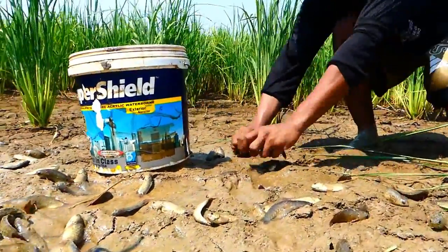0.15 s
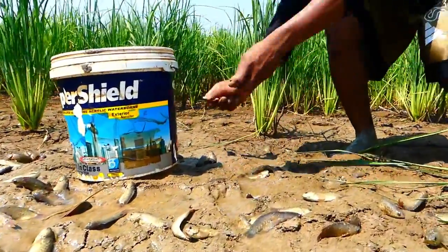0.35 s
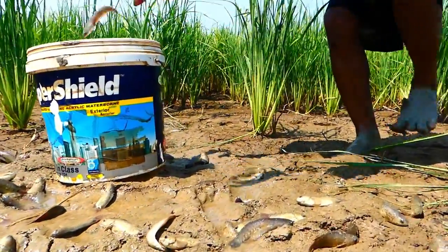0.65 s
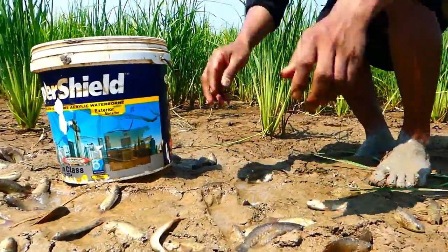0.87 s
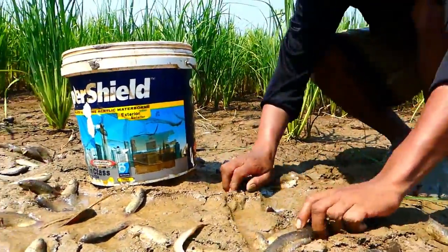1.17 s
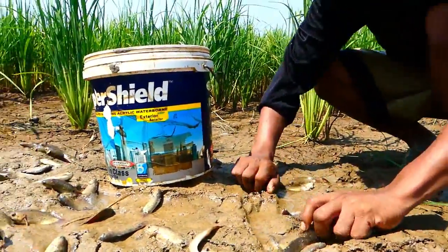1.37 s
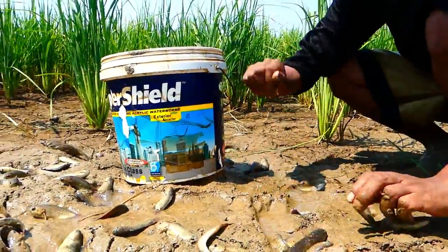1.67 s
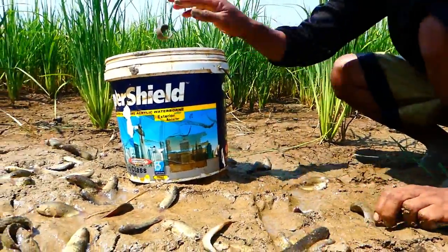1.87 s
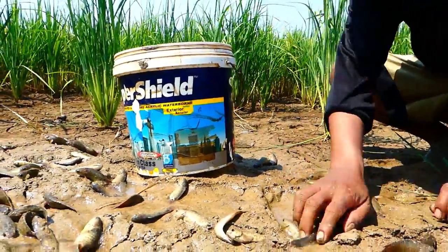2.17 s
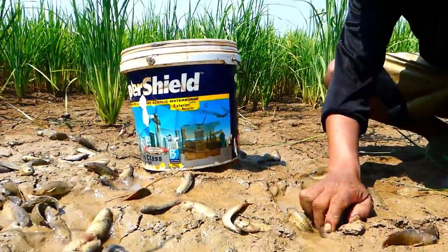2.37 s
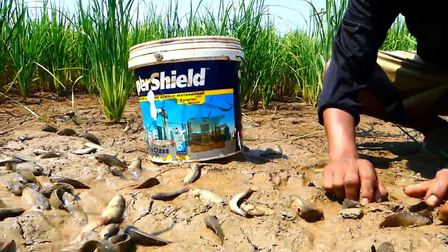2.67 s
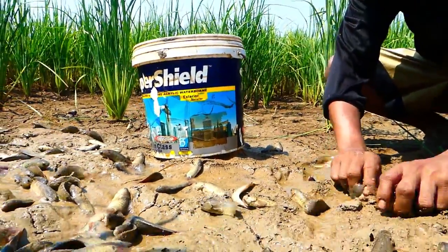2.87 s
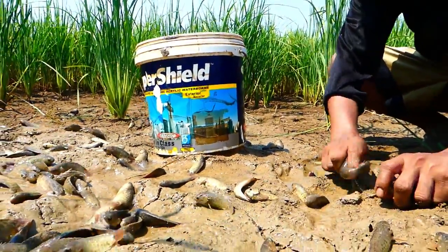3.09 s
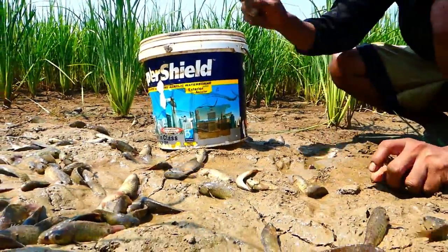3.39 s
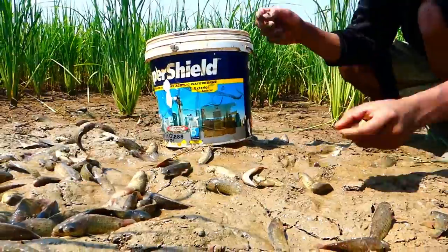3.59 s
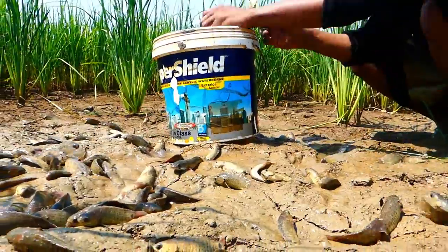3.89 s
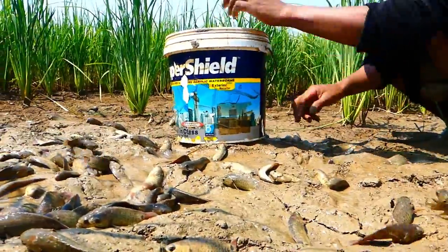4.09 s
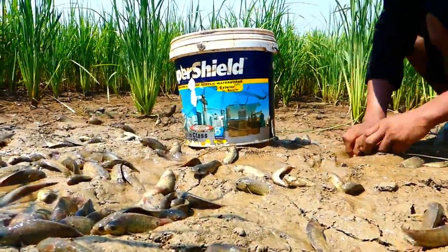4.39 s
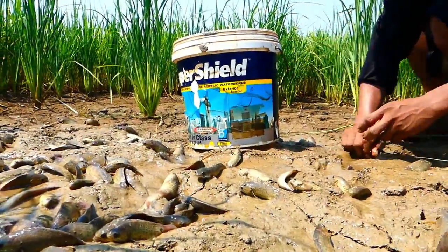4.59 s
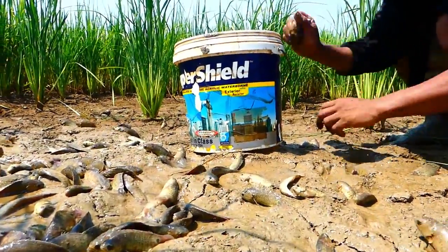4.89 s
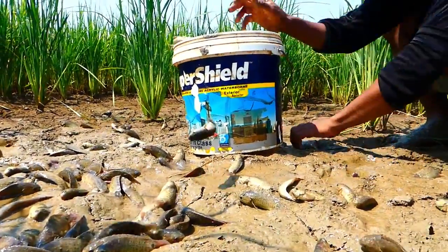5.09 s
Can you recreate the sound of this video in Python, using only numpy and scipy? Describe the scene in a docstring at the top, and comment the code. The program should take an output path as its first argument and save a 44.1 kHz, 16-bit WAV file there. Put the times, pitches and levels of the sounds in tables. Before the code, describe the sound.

Dull, wet thuds come in uneven clusters as fish flop and hands grab at them in a muddy field. Sharp little pops, squelches and a brief slippery squeak fill the middle, then a louder run of slaps follows. A few hollow plastic bucket knocks sound early on and at the close. Fine crackling from wriggling fish continues underneath, heard nearby in dry, open air.

```python
"""Fish flopping in a muddy field

Live fish flop on the soft mud of a drained field while someone drops them in a plastic bucket.
Bodies, hands and feet land with dull thuds and wet spatter; mud squelches, pops and squeaks as it
lets go. Under it all a heap of fish wriggles with a sticky crackle, in open air with almost no echo."""
import sys
import numpy as np
from scipy import signal
from scipy.fft import rfft, irfft
from scipy.io import wavfile
from scipy.ndimage import uniform_filter1d

SR = 44100
rng = np.random.default_rng(int(sys.argv[2]) if len(sys.argv) > 2 else 0)


def store_pcm(level_fs):
    """Save levels as 16-bit WAV."""
    pcm = np.round(np.clip(level_fs, -1, 1) * 32767).astype(np.int16)
    wavfile.write(sys.argv[1], SR, np.atleast_2d(pcm).T)


N = 231294


def gain_of(db):
    """Turns decibels into a number to multiply a sound by."""
    return 10 ** (np.asarray(db) / 20)


def evened(x):
    """Scales x to an average strength (rms) of 1."""
    return x / np.sqrt(np.mean(x ** 2) + 1e-20)


def wobble(size, smooth_samples):
    """A random curve that drifts up and down."""
    return evened(uniform_filter1d(rng.standard_normal(size), smooth_samples))


def read(points, hz):
    """Looks up hz in a table, blending between rows on a log-frequency scale."""
    f, value = np.transpose(points)
    return np.interp(np.log(hz + 1), np.log(f + 1), value)


def add(mix, s, sound):
    """Mixes a sound in, starting at s seconds."""
    part = mix[:, max(round(s * SR), 0):][:, :sound.shape[-1]]
    part += sound[..., :part.shape[1]]


def panned(x, pan_db):
    """Places a sound to the left (above 0 dB) or right (below)."""
    return x * gain_of([[pan_db / 2], [-pan_db / 2]])


def coloured(x, spectrum):
    """Gives x a colour (a balance of low and high), at strength 1."""
    size = x.shape[-1]
    gains = gain_of(read(spectrum, np.fft.rfftfreq(size, 1 / SR)))
    return evened(irfft(rfft(x) * gains, size))


# how alike the two ears hear a noise: f/Hz, likeness (1 = the same)
EAR_LIKENESS = [(40, 0.14), (120, 0.09), (300, 0.25), (1000, 0.33), (2500, 0.5), (6000, 0.8), (14000, 0.42)]
def noise(spectrum, size, grit=0.):
    """Stereo noise, partly alike in both ears; grit makes it grainy."""
    white = rng.standard_normal((2, size))
    grains = np.exp(grit * np.clip(rng.standard_normal(size), -2, 2))
    left, other = rfft(white * grains)
    same = np.clip(read(EAR_LIKENESS, np.fft.rfftfreq(size, 1 / SR)), -1, 1)
    right = same * left + np.sqrt(1 - same ** 2) * other
    return coloured(irfft([left, right], size), spectrum)


def droplets(spectrum, size, grit=0.77, tint_db=2.6):
    """Grainy noise with its own colour: every splash finds other hollows in the mud."""
    hz = np.geomspace(40, 16000, 28)
    levels = read(spectrum, hz) + tint_db * rng.standard_normal(len(hz))
    return noise(np.transpose([hz, levels]), size, grit)


def swell(t, peak_s):
    """Rises to 1 at peak_s, then dies away."""
    return t / peak_s * np.exp(1 - t / peak_s)


def ring(t, hz, peak_s, bend=0):
    """A pocket of air rings briefly; with bend=0.2 it starts 20% high and settles to hz."""
    turns = hz * (t + bend * peak_s * (1 - np.exp(-t / peak_s)))
    return swell(t, peak_s) * np.sin(2 * np.pi * turns)


# colour of the open air: f/Hz, level/dB
AIR_COLOUR = [(20, 10), (100, 2.5), (350, 5), (900, 5.5), (1900, -3.5), (2500, -0.5), (4200, -6),
              (7500, -23), (10000, -18), (16000, -25)]
def field_air(level_db=-51):
    """The steady hiss of the open field."""
    return gain_of(level_db) * noise(AIR_COLOUR, N)


# faint trills: t/s, length/s, level/dB
INSECT_CALLS = [(0, 0.1, -58), (0.598, 0.14, -58.5), (1.382, 0.25, -56)]
# their colour: f/Hz, level/dB
INSECT_COLOUR = [(2000, -59), (2800, -2), (2950, 1), (3100, -11), (4200, -50)]
def insect():
    """A thin, high buzz comes and goes, perhaps a far insect."""
    out = np.zeros((2, N))
    for s, length, db in INSECT_CALLS:
        fade = signal.windows.tukey(round(length * SR), .5)
        add(out, s, gain_of(db) * fade * noise(INSECT_COLOUR, SR)[:, :len(fade)])
    return out


# colour of the rub: f/Hz, level/dB
RUB_COLOUR = [(400, -20), (1000, -5), (1250, 6), (1700, -11), (4000, -31)]
def rub(start_s=3.56, length_s=0.14, level_db=-49.5):
    """One soft, hollow stroke, perhaps a sleeve or a fish sliding in the hand."""
    out, stroke = np.zeros((2, N)), np.hanning(round(length_s * SR))
    add(out, start_s, gain_of(level_db) * stroke * noise(RUB_COLOUR, SR)[:, :len(stroke)])
    return out


# how busy the mud is, before each layer's own gain: t/s, churn/dB, crackle/dB, fizz/dB
MUD_ACTIVITY = [(0.0, -51, -48, -54.5), (0.79, -56, -52.5, -56), (0.95, -41.5, -49.5, -50.5),
                (1.21, -54.5, -49.5, -56), (1.44, -57.5, -51, -56), (2.16, -45.5, -46.5, -55.5),
                (2.79, -53, -49, -51.5), (2.96, -49.5, -46.5, -55.5), (3.3, -44, -49, -53),
                (3.44, -54.5, -49.5, -60), (3.78, -54, -52.5, -53), (4.1, -52.5, -53.5, -59),
                (4.28, -51, -49.5, -57.5), (4.48, -50, -47, -55), (4.79, -49, -51, -55.5),
                (5.24, -52, -51.5, -55.5)]
def activity(layer):
    """How one layer of the mud's sound grows and fades over time."""
    times, churn, crackle, fizz = np.transpose(MUD_ACTIVITY)
    levels = {"churn": churn, "crackle": crackle, "fizz": fizz}[layer]
    return gain_of(np.interp(np.arange(N) / SR, times, levels))


# colour of the low churning: f/Hz, level/dB
CHURN_COLOUR = [(20, -19), (70, -12), (140, 1.5), (340, 3.5), (600, -2), (1000, -25), (2000, -21.5),
                (6000, -74)]
# colour of the fine fizz: f/Hz, level/dB
FIZZ_COLOUR = [(1500, 2), (4500, -5.5), (6800, 0), (7800, -6.5), (10000, -2), (13000, -5.5), (16000, -11)]
def sliding(churn_db=2.5, fizz_db=1.45, flutter_db=2.1):
    """Bodies slide through the mud: a low, uneven churning and a gritty fizz."""
    churn = gain_of(churn_db + flutter_db * wobble(N, 900)) * noise(CHURN_COLOUR, N)
    fizz = gain_of(fizz_db + flutter_db * wobble(N, 400)) * noise(FIZZ_COLOUR, N, grit=1.0)
    return activity("churn") * churn + activity("fizz") * fizz


# colour of the sticky crackle: f/Hz, level/dB
CRACKLE_COLOUR = [(500, -77), (1100, -4), (1800, 6.5), (2600, -0.5), (4200, 3.5), (6000, -4.5), (10000, -5),
                  (16000, -50)]
def wriggling(crackle_db=0.5, tearing_db=-6, base_pops_per_s=520, pitches=96, clumping=.55):
    """Many fish wriggle in the wet: tiny pops of every size come in clumps, left and right."""
    out, t = np.zeros((2, N)), np.arange(700) / SR
    pop_chance = np.exp(clumping * wobble(N, 1100)) * base_pops_per_s / pitches / SR
    for hz in np.geomspace(800, 12000, pitches):
        starts = np.flatnonzero(rng.random(N) < pop_chance)
        peak_s = rng.uniform(.4, 2.2) / hz
        # an air pocket rings while the wet film around it tears
        band = [(hz / 3, -24), (hz, 0), (hz * 3, -24)]
        tearing = swell(t, 0.0014) * coloured(rng.standard_normal(len(t)), band)
        pop = evened(ring(t, hz, peak_s, bend=-0.18) + gain_of(tearing_db) * tearing)
        boosts_db = 3.8 * np.minimum(rng.exponential(1, len(starts)), 4)
        for start, db in zip(starts, boosts_db):
            add(out, start / SR, panned(gain_of(db) * pop, pan_db=rng.normal(0, 6)))
    return gain_of(crackle_db) * activity("crackle") * coloured(out, CRACKLE_COLOUR)


# drags through the mud: t/s, length/s, level/dB
MUD_DRAGS = [(0.373, 0.18, -47.5), (0.701, 0.23, -43), (1.692, 0.086, -45.5), (1.825, 0.056, -47),
             (1.954, 0.039, -39.5), (2.121, 0.054, -47.5), (3.399, 0.068, -33), (3.659, 0.045, -42),
             (4.066, 0.066, -41), (5.123, 0.031, -35), (5.16, 0.037, -48)]
# their colour: f/Hz, level/dB
SQUELCH_COLOUR = [(300, 8), (1000, 6), (2000, 5.5), (3500, 3.5), (5200, 3.5), (7500, -1), (10000, 1.5),
                  (13000, -2), (16000, -7)]
def squelches(lumps_db=3.1, size=16384):
    """Feet, fingers and fish drag through wet mud with a lumpy swish that swells and fades."""
    out = np.zeros((2, N))
    for s, length, db in MUD_DRAGS:
        swish = gain_of(lumps_db * wobble(size, 250)) * noise(SQUELCH_COLOUR, size, grit=0.24)
        stroke = np.hanning(round(length * SR))
        add(out, s, gain_of(db) * stroke * swish[:, :len(stroke)])
    return out


# bursting mud: t/s, level/dB, f/Hz, spray/dB, left over right/dB
MUD_POPS = [(.297, -23.5, 9200, -51, -5), (.316, -19, 2070, -43, -4), (0.9006, -29.5, 4160, -53, 2),
            (0.9438, -33.5, 1130, -33.5, -2), (1.1997, -37, 2140, -36, 2), (1.2375, -32.5, 3100, -43, 10),
            (1.67, -24, 3980, -41.5, 5), (1.894, -26.5, 1670, -37, 2), (1.98, -23, 10000, -27, 0),
            (2.536, -27, 4600, -33.5, -3), (2.572, -19, 1730, -53, -2), (2.602, -23.5, 3630, -35.5, -3),
            (2.639, -18.5, 4570, -28.5, -2), (2.723, -43, 6740, -31.5, -2), (2.7286, -28, 2140, -30.5, -2),
            (2.7604, -28, 4330, -34, -2), (2.828, -31, 2100, -35, 4), (2.877, -22.5, 9300, -39, -4),
            (2.957, -24, 3730, -42, 5), (3.05, -16, 7100, -38, -2.5), (3.1801, -28, 5400, -34, 1),
            (3.196, -30.5, 1280, -33, -3), (3.365, -21.5, 7200, -31.5, 1), (3.389, -22.5, 4220, -34, -2),
            (3.553, -28, 6900, -33.5, 3), (3.8773, -33.5, 1840, -36, 1), (4.5482, -27, 3660, -43, 2),
            (4.802, -29.5, 3830, -38, 2), (5.038, -24.5, 2530, -38.5, -5), (5.107, -35.5, 2340, -42, -3)]
# colour of the spray from pops and squeaks: f/Hz, level/dB
SPRAY_COLOUR = [(200, -7), (700, 6.5), (1500, 9), (4000, 8), (8000, 7.5), (12000, 0), (20000, -4)]
def pops(peak_cycles=1.07, spray_s=0.0012, middle_hz=3500):
    """A film of mud bursts: its air pocket rings and throws spray. Small pockets end sooner."""
    out, t = np.zeros((2, N)), np.arange(2048) / SR
    for s, db, hz, spray_db, pan_db in MUD_POPS:
        colour = np.array(SPRAY_COLOUR) * [(hz / middle_hz) ** 0.56, 1]  # smaller pocket, finer spray
        spray = gain_of(spray_db) * swell(t, spray_s) * droplets(colour, len(t))
        pocket = gain_of(db) * ring(t, hz, peak_cycles / hz, bend=-0.012)
        add(out, s, panned(pocket + spray, pan_db))
    return out


# slippery skin squeezed in the fingers: t/s, length/s, relative level/dB, f/Hz, slip rate/Hz
SKIN_SQUEAKS = [(3.217, 0.023, -6.5, 2936, 245), (3.4117, 0.018, -13.5, 3200, 560)]
def squeaks(slip_s=0.00084, spray_db=-20, growth_db=5):
    """Wet skin sticks and slips; each slip rings the same narrow gap, harder as the grip tightens."""
    out, t = np.zeros((2, N)), np.arange(2048) / SR
    for s, length, db, hz, rate in SKIN_SQUEAKS:
        for at in np.arange(0, length, 1 / rate):
            late, detune, force = rng.standard_normal(3)
            gap = ring(t, hz * (1 + .055 * detune), slip_s)
            spray = gain_of(spray_db) * swell(t, 0.00093) * noise(SPRAY_COLOUR, len(t), grit=0.49)
            slip_db = db + 1.4 * force + growth_db * (at / length - 2.5)
            add(out, s + at + 0.061 * late / rate, panned(gain_of(slip_db) * (gap + spray), pan_db=-3))
    return out


# fish hitting the bucket: t/s, note/dB, wet smack/dB
BUCKET_HITS = [(0.7788, -21, -21), (.785, -32, -28), (0.8057, -29, -23.5), (1.984, -11, -24.5),
               (2.02, -23, -34), (3.8005, -35.5, -37), (5.13, -14.5, -17), (5.139, -23, -33),
               (5.147, -26, -31), (5.16, -36, -21)]
# tones of the bucket, muffled by its load: f/Hz, level/dB, time to peak/s
BUCKET_TONES = [(154, -23, 0.0069), (366, -5.5, 0.0032), (586.6, -0.5, 0.0045), (704, -8.5, 0.0028),
                (1163, -13.5, 0.0017), (1510, -28, 0.0066)]
# colour of the smack: f/Hz, level/dB
SMACK_COLOUR = [(40, -28), (200, 0), (500, 13), (950, 6.5), (1500, 0), (2300, -6.5), (4500, -10.5),
                (7000, -22), (11000, -18), (16000, -33)]
def bucket_knocks(smack_s=.0017, drops_db=-14, drops_s=.006):
    """A fish smacks the inside of the bucket, which answers with a short, hollow note."""
    out, t = np.zeros((2, N)), np.arange(4096) / SR
    note = sum(gain_of(db) * ring(t, hz, peak_s) for hz, db, peak_s in BUCKET_TONES)
    for s, db, smack_db in BUCKET_HITS:
        splash = swell(t, smack_s) + gain_of(drops_db) * swell(t, drops_s)
        smack = gain_of(smack_db) * splash * droplets(SMACK_COLOUR, len(t))
        add(out, s, panned(gain_of(db) * note + smack, pan_db=1.5))
    return out


def flap(t, after_s=0.046, level_db=-45.5, hz=318.5):
    """A body drops back softly under its own weight. Gives a delay and a sound, new each time."""
    late, size = rng.uniform(.75, 1.25, 2)
    return after_s * late, gain_of(level_db) * ring(t, hz / size, peak_s=0.0045)


# blows on the mud: t/s, thud/dB, f/Hz, deep give of the ground/dB, spatter/dB
MUD_BLOWS = [(.853, -25, 293, -49, -35), (.862, -11.5, 285, -56, -20), (0.974, -23.5, 380, -42, -28.5),
             (1.02, -25, 334, -35, -38), (1.032, -17.5, 280, -54, -54), (1.099, -34, 298, -56, -41),
             (1.482, -29, 318, -37, -36.5), (1.51, -22.5, 297, -27.5, -50), (1.576, -33, 296, -41, -42),
             (1.722, -29.5, 237, -45, -38), (1.85, -41, 338, -51, -37), (1.875, -27.5, 293, -30, -39.5),
             (2.153, -27, 297, -61, -37), (2.251, -35, 321, -48, -44), (2.2893, -12, 296, -49, -37),
             (2.2967, -12.5, 309, -55, -48), (2.3048, -16.5, 543, -37, -29),
             (2.354, -30.5, 302, -43, -34.5), (2.425, -32.5, 350, -57, -43), (2.773, -31.5, 374, -42, -41),
             (2.812, -35, 309, -30, -42.5), (2.986, -20.5, 451, -39, -32), (2.9912, -19.5, 313, -47, -41),
             (3.086, -38, 323, -37, -33.5), (3.238, -32.5, 280, -40, -28.5), (3.294, -34, 280, -39, -48),
             (3.8, -23.5, 291, -40, -52), (3.817, -32, 354, -51, -40), (4.063, -29, 395, -51, -28),
             (4.082, -24.5, 400, -31, -41), (4.099, -9.5, 308, -16, -23), (4.1143, -6.5, 620, -25.5, -24),
             (4.1174, -1.5, 320, -21, -45), (4.2581, -14, 288, -29, -34), (4.275, -28, 370, -51, -37.5),
             (4.291, -27, 300, -33.5, -34.5), (4.311, -20.5, 374, -46, -44), (4.328, -30, 320, -44, -50),
             (4.387, -12, 277.4, -23.5, -36.5), (4.51, -24, 292, -32, -36.5), (4.729, -28, 320, -37, -34.5),
             (4.752, -9.5, 289, -22, -49), (4.946, -18.5, 278, -26, -39), (5.137, -25, 306, -56, -20.5),
             (5.168, -34, 376, -52, -26), (5.188, -25, 315, -34, -35)]
# colour of the shaking ground: f/Hz, level/dB
GROUND_COLOUR = [(25, -23), (45, 12), (70, -37), (115, -11.5), (170, -29), (225, 12.5), (330, -9),
                 (560, 6.5), (900, -28), (2500, -57), (8000, -51)]
# colour of the wet spatter: f/Hz, level/dB
SPATTER_COLOUR = [(40, -52), (130, -38), (250, 20), (700, -0.5), (1300, 1), (2500, -9), (5000, -19),
                  (10000, -25.5), (16000, -32)]
def slaps(peak_cycles=0.71, contact_db=-11, ground_db=-17, settle_db=-28, settle_s=0.019, drops_db=-16):
    """A soft body hits the mud and traps air: a falling thud, shaking ground, spatter, then a flap."""
    out, t = np.zeros((2, N)), np.arange(8192) / SR
    splash = swell(t, peak_s=0.0036) + gain_of(drops_db) * swell(t, peak_s=0.0068)
    for s, db, hz, give_db, spatter_db in MUD_BLOWS:
        peak_s = peak_cycles * 2 ** (-db / 27) / hz  # 27 dB softer takes twice as long to sink in
        # the first small patch to touch sounds higher than the whole body
        contact = gain_of(contact_db) * ring(t, hz * 2.14, peak_s=0.00076)
        thud = ring(t, hz, peak_s, bend=0.22) + contact
        jolt = gain_of(ground_db) * swell(t, peak_s)
        settling = gain_of(settle_db) * np.exp(-t / settle_s) * (1 - np.exp(-t / peak_s))
        shudder = (jolt + settling) * noise(GROUND_COLOUR, len(t))
        give = gain_of(give_db) * ring(t, hz=184, peak_s=0.0074)
        spatter = gain_of(spatter_db) * splash * droplets(SPATTER_COLOUR, len(t))
        add(out, s, panned(gain_of(db) * (thud + shudder) + give + spatter, pan_db=1.0))
        delay_s, soft_landing = flap(t)
        add(out, s + delay_s, soft_landing)
    return out


def surroundings(x, bounce_s=0.0026, bounce_db=-14, scatter_db=-14, scatter_s=0.0046):
    """High sounds bounce once off the ground and scatter briefly from the bucket and the stalks."""
    t = np.arange(4096) / SR
    echoes = rng.standard_normal((2, len(t))) * swell(t, scatter_s)
    echoes *= gain_of(scatter_db) / np.linalg.norm(echoes[0])
    echoes[:, round(bounce_s * SR)] += gain_of(bounce_db)
    treble = signal.sosfilt(signal.butter(2, 900, "high", fs=SR, output="sos"), x)
    return x + signal.oaconvolve(treble, echoes, axes=1)[:, :N]


def scene():
    """Mixes the soft background with the sharp sounds, which get a faint echo."""
    soft = field_air() + insect() + rub() + sliding() + squelches()
    sharp = wriggling() + pops() + squeaks() + bucket_knocks() + slaps()
    return soft + surroundings(sharp)


def record(dry, low_hz=125, high_hz=15900):
    """The microphone thins the deep bass; then the very highest sounds are cut off."""
    thin = signal.sosfilt(signal.butter(1, low_hz, "high", fs=SR, output="sos"), dry)
    treble_cut = signal.firwin(511, high_hz, window=("kaiser", 9), fs=SR)
    return signal.oaconvolve(thin, treble_cut[None], "same")


dry = scene()
out = record(dry)
store_pcm(out)
```